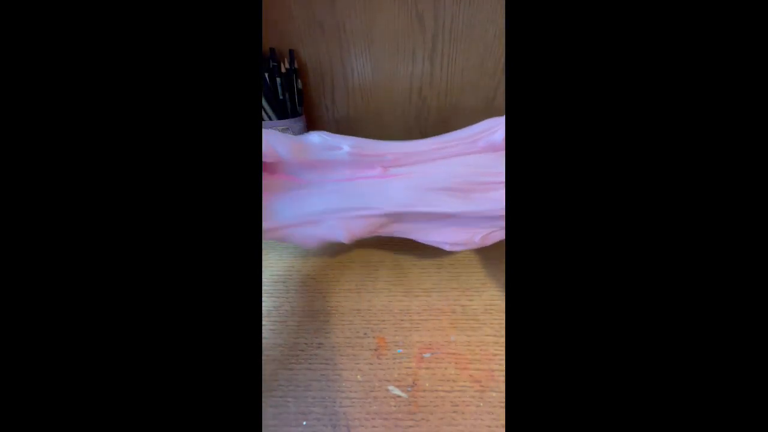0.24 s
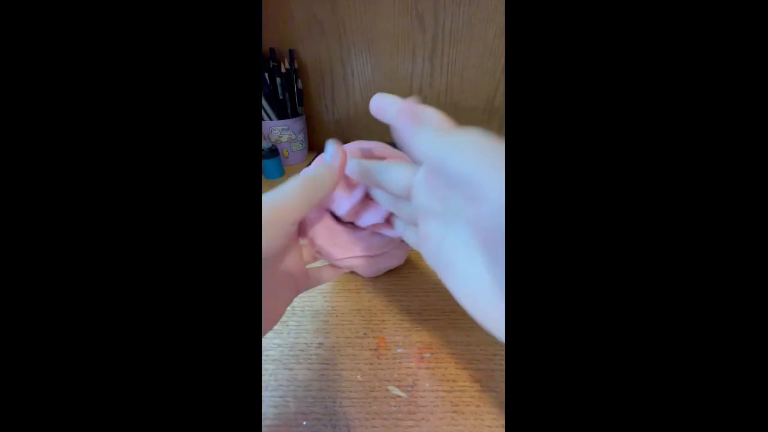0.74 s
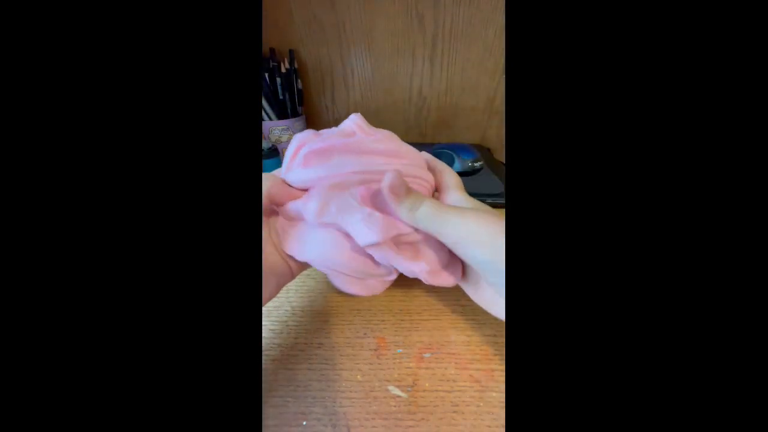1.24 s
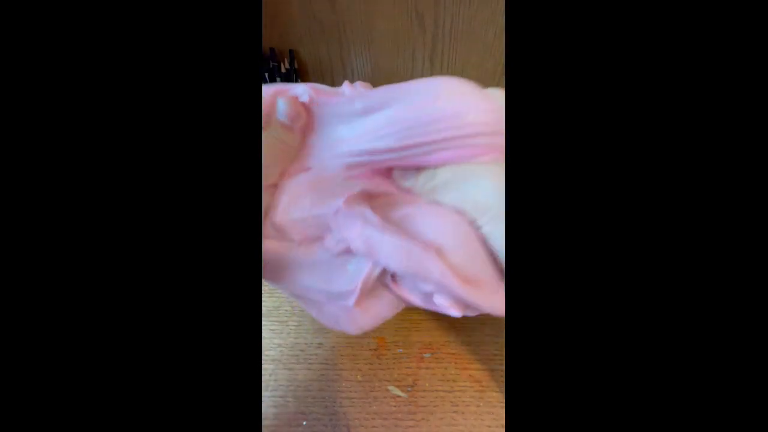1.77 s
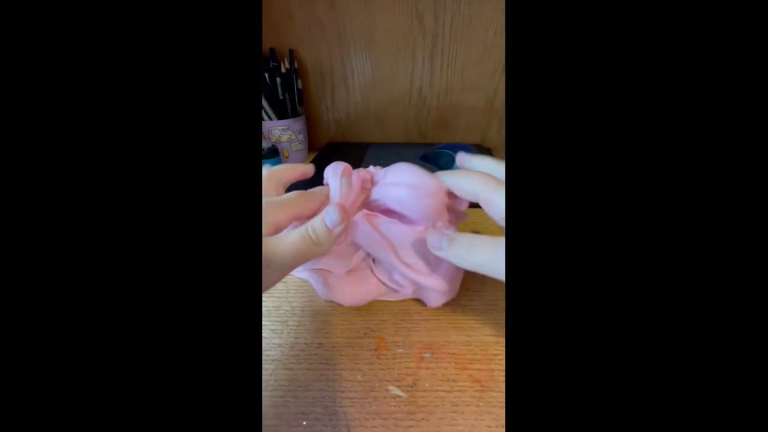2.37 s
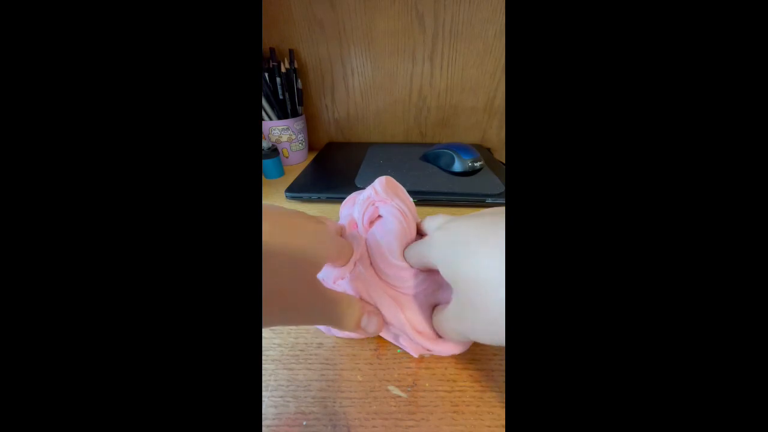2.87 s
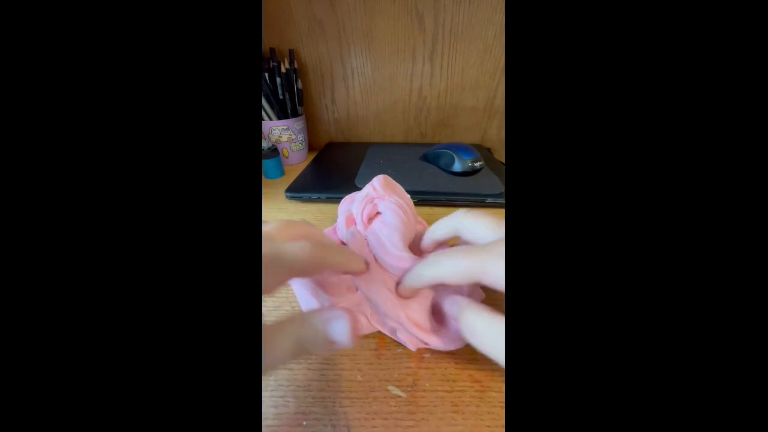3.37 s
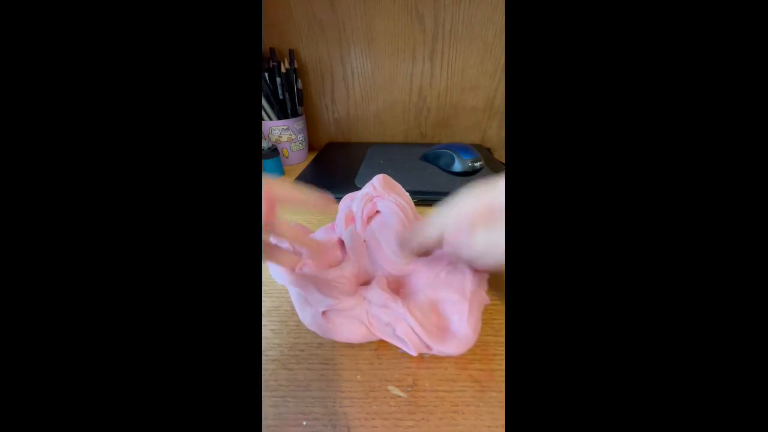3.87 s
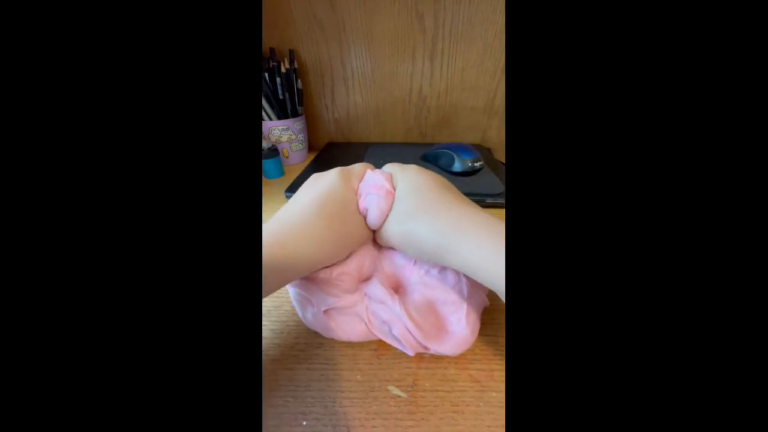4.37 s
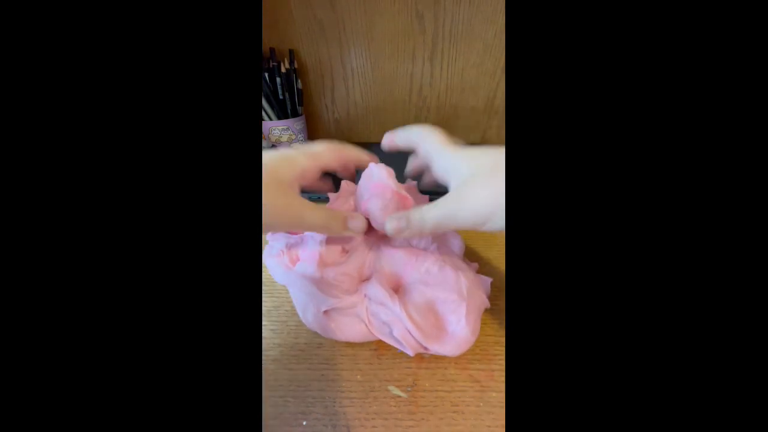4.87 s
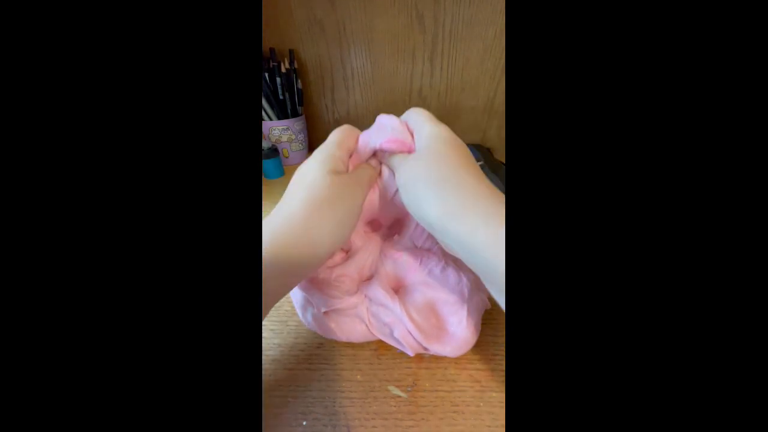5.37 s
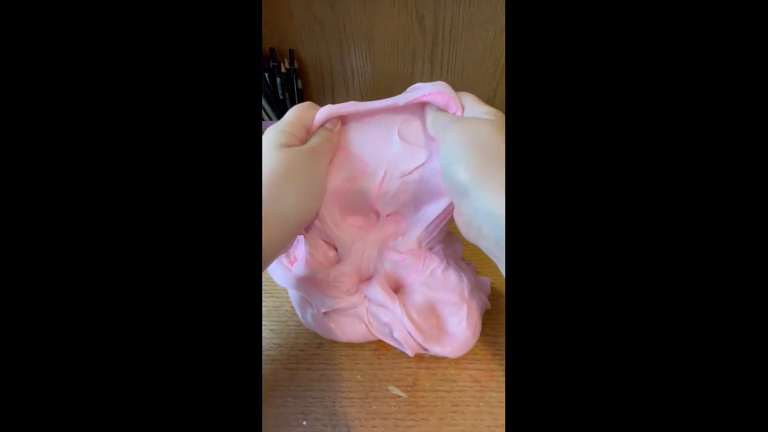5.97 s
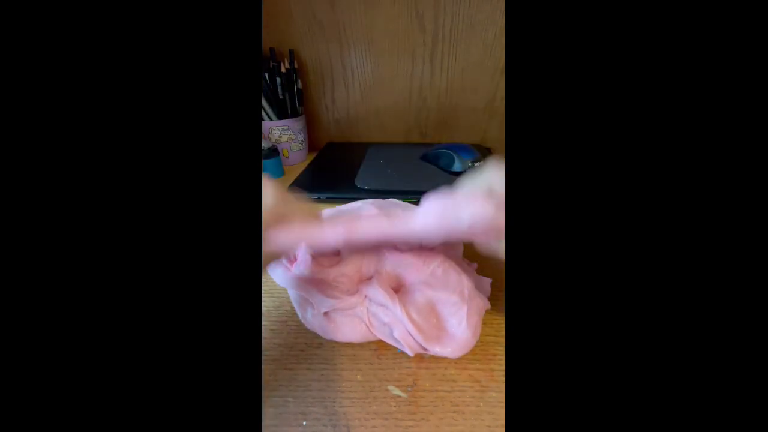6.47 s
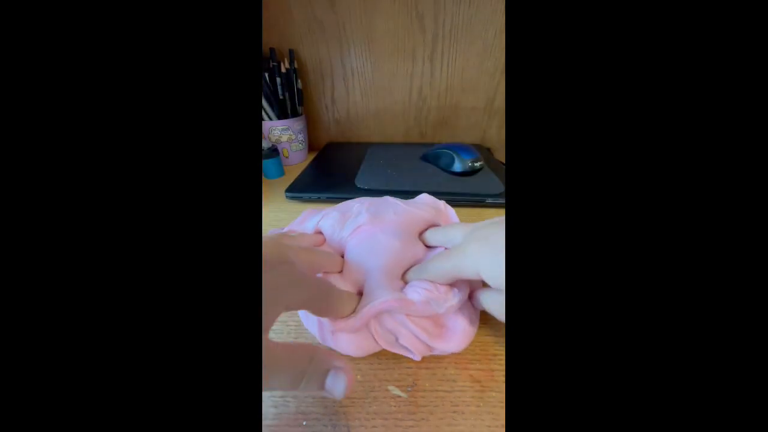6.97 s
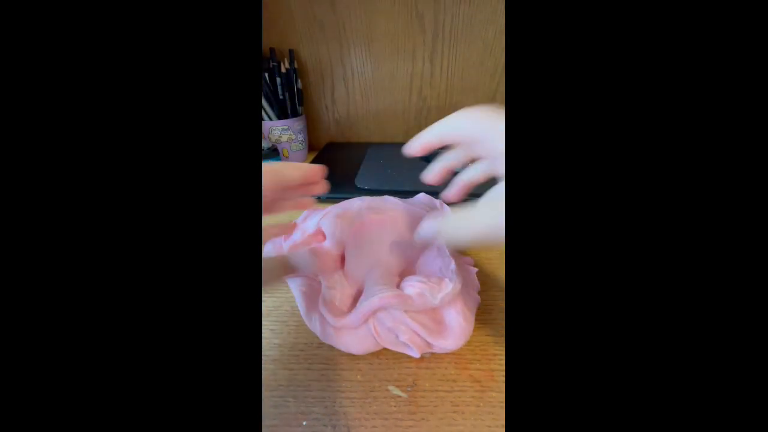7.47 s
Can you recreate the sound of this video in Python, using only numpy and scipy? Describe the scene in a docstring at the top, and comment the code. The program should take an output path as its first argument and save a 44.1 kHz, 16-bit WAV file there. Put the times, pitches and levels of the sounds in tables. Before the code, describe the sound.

Hands knead and stretch thick wet slime up close, with sticky crackles, squelches, sharp snaps, small air pops and soft desk thumps.

```python
"""Wooden desk in a quiet room: hands knead, squeeze and fold thick slime close to a small stereo microphone.
Sticky skin peels in dense crackle and wet ticks; films snap as noise bursts; air pockets pop as sagging tones.
Squeezed air squelches in ringing bubbles and once squeaks through a slit; the lump hisses as it slides.
Pushes and landings excite the desk's modes; snaps, pops and squeak get short echoes; shaped noise is the hush."""
import sys
import numpy as np
from scipy import signal
from scipy.fft import rfft, irfft, next_fast_len
from scipy.io import wavfile
from scipy.ndimage import uniform_filter1d

SR = 44100
rng = np.random.default_rng(int(sys.argv[2]) if len(sys.argv) > 2 else 0)


def log_audio(samples):
    """Write samples as a 16-bit WAV file to the path given in sys.argv[1]."""
    # one column per channel
    frames = np.atleast_2d(samples).T
    # limit to full scale, then quantise
    limited = np.clip(frames, -1, 1)
    pcm = np.round(limited * 32767).astype(np.int16)
    wavfile.write(sys.argv[1], SR, pcm)


def amplitude_ratio(level_db):
    """Convert a level in decibels to the matching linear amplitude (field) ratio."""
    exponent = np.asarray(level_db, float) / 20
    return 10 ** exponent


N = 340893


def evened(x):
    """Scales to rms 1."""
    return x / np.sqrt(np.mean(x ** 2) + 1e-20)


def read(points, hz):
    """Interpolates a spectrum on a log-frequency axis."""
    point_hz, value = np.transpose(points)
    return np.interp(np.log(hz + 1), np.log(point_hz + 1), value)


def resonate(x, hz, width_hz):
    """Single resonance of about unit peak gain."""
    r = np.exp(-np.pi * width_hz / SR)
    pole = r * np.exp(2j * np.pi * hz / SR)
    return 2 * signal.lfilter([1 - r], [1, -pole], x).real


def add(mix, start_s, mid, side):
    """Places a sound in time; the side part is what differs between the ports."""
    part = mix[:, round(start_s * SR):][:, :len(mid)]
    part += np.array([mid + side, mid - side])[:, :part.shape[1]]


def clicks(per_s, spread_db, clump_db, clump_s):
    """Random ticks of either sign and uneven size, their level drifting in clumps."""
    size = amplitude_ratio(spread_db * np.minimum(rng.exponential(1, N), 5))
    size = size * rng.choice([-1., 1.], N)
    clumps = evened(uniform_filter1d(rng.standard_normal(N), max(round(clump_s * SR), 1)))
    return size * (rng.random(N) < per_s / SR) * amplitude_ratio(clump_db * clumps)


# left-right likeness: (frequency [Hz], likeness [0..1])
LIKENESS = [(60, 0.38), (250, 0.11), (600, 0.32), (1400, 0.33), (3100, 0.057), (6800, 0.75), (15000, 0.72)]


def pair(a, b, spectrum):
    """Colours two signals and blends them to the left-right likeness."""
    size = next_fast_len(N)
    hz = np.fft.rfftfreq(size, 1 / SR)
    same = np.clip(read(LIKENESS, hz), 0, 1)
    mid = np.sqrt((1 + same) / 2) * rfft(a, size)
    side = np.sqrt((1 - same) / 2) * rfft(b, size)
    coloured = np.array([mid + side, mid - side]) * amplitude_ratio(read(spectrum, hz))
    return evened(irfft(coloured, size)[:, :N])


# squeezes, pulls, presses: (start [s], hold [s], peeling [dB], squelch [dB], push on the desk [dB])
STROKES = [(0.322, 0.12, -43.5, -57, -54), (0.664, .005, -64, -70.5, -62.5),
           (0.761, 0.018, -50, -67.5, -73), (0.828, 0.0077, -46, -64, -63),
           (1.088, 0.026, -51.5, -69, -77.5), (1.134, 0.0024, -63, -60.5, -55.5),
           (1.194, 0.023, -50, -69, -64.5), (1.271, .005, -67, -69, -52.5), (1.324, 0.007, -63, -60, -37),
           (1.385, 0.006, -46.5, -67.5, -48), (1.462, 0.0037, -53.5, -58, -64),
           (1.572, 0.012, -49, -60.5, -58.5), (1.677, 0.033, -56.5, -51.5, -70),
           (1.939, .005, -54.5, -65.5, -79), (2.219, 0.11, -37, -37, -32.5),
           (2.403, 0.006, -62.5, -60, -47.5), (2.609, 0.0077, -53.5, -56, -57),
           (2.729, 0.0085, -62.5, -65.5, -63.5), (2.865, .005, -49, -59.5, -51),
           (2.96, 0.016, -70.5, -64.5, -50), (3.097, 0.094, -44, -40, -27), (3.301, 0.055, -72, -70, -40),
           (3.516, 0.0026, -55.5, -67, -57.5), (3.846, .055, -38, -36.5, -32),
           (3.93, 0.024, -47.5, -41, -36.5), (4.155, 0.0056, -46, -50, -57.5),
           (4.297, 0.023, -36.5, -59.5, -56), (4.374, 0.0044, -38, -48, -46.5),
           (4.471, 0.029, -37.5, -50, -55), (4.736, 0.011, -49.5, -72, -71.5),
           (4.779, 0.093, -38, -34, -34.5), (4.912, .005, -62.5, -56.5, -41.5),
           (5.094, 0.0055, -64, -61, -50.5), (5.183, 0.0097, -49.5, -59, -46),
           (5.265, 0.002, -46.5, -51.5, -42.5), (5.296, .04, -68.5, -63.5, -38),
           (5.499, 0.0044, -55, -51, -48), (6.381, 0.097, -45, -60.5, -52),
           (6.526, .05, -53.5, -62.5, -70.5), (6.603, 0.0073, -44, -61, -56),
           (6.876, .005, -58.5, -55.5, -57), (7.335, 0.0067, -39.5, -53.5, -33),
           (7.345, 0.051, -41.5, -38, -33.5), (7.623, 0.0056, -56.5, -57.5, -55.5)]
# peeling, squelch, push along a stroke:
# (full from [share of hold], until [share of hold], rise at -48.5 dB [dB/s], fall [dB/s])
FOLLOW = [(0, 1.17, 521.5, 418.5), (.45, 0.94, 376.5, 263), (.45, .6, 424, 236)]
# fingers resting and sliding between strokes: (time [s], contact [dB], wetness [dB])
TOUCH = [(0, -63, -41), (.15, -75, -35), (0.312, -47.5, -17.5), (0.601, -60, -14), (0.959, -67, -37),
         (1.518, -65.5, -0.5), (1.8, -54, -6), (2.15, -72.5, -14.5), (2.551, -62, -11.5), (3.051, -66.5, 1),
         (3.36, -73.5, -4), (3.452, -62, -5.5), (3.721, -75, -7), (4.091, -71, -9), (4.259, -51.5, -13.5),
         (4.549, -52.5, 2.5), (4.679, -62, -22), (5.019, -80.5, -0.5), (5.15, -64.5, -3.5),
         (5.451, -54.5, -5.5), (5.62, -67.5, -6), (5.98, -73.5, -32), (6.25, -85, -3.5), (6.7, -69.5, -5),
         (7.07, -65, -6), (7.17, -72.5, -8), (7.28, -81.5, -19.5), (7.471, -69.5, -7.5),
         (7.73, -60.5, -3.5)]
# per layer: (weight of wetness in the resting level [dB/dB])
WET_SHARE = [0, 1, 0.93]
# per layer: (offset of the resting level [dB])
REST_DB = [1.5, -3, -13.5]


def effort(layer):
    """Gain of layer 0 peeling, 1 squelch, 2 push: strokes over resting contact; powers add."""
    hurry = 0.22  # stronger strokes rise faster: dB of speed per dB of strength
    t = np.arange(0, N / SR + .004, .002)
    strokes = np.array(STROKES)[:, :, None]
    start_s, hold_s, db = strokes[:, 0], strokes[:, 1], strokes[:, 2 + layer]
    begin, end, rise, fall = FOLLOW[layer]
    rise = rise * amplitude_ratio(hurry * (db + 48.5))
    before_db = rise * (start_s + begin * hold_s - t)
    after_db = fall * (t - start_s - end * hold_s)
    below_db = np.maximum(np.maximum(before_db, after_db), 0)
    touch_s, contact_db, wet_db = np.transpose(TOUCH)
    rest_db = np.interp(t, touch_s, contact_db + WET_SHARE[layer] * wet_db + REST_DB[layer])
    power = amplitude_ratio(rest_db) ** 2 + (amplitude_ratio(db - below_db) ** 2).sum(0)
    return np.interp(np.arange(N) / SR, t, np.sqrt(power))


# colour of the hush: (frequency [Hz], relative density [dB per Hz])
HUSH = [(15, -32), (25, -0.5), (80, 4), (242, -9), (373, -10.5), (887, -42.5), (12200, -20.5),
        (16000, -24.5)]


def hush():
    """Steady shaped noise of the quiet room."""
    hush_rms_db = -73
    return amplitude_ratio(hush_rms_db) * pair(*rng.standard_normal((2, N)), HUSH)


# decay of the echoes: (frequency [Hz], t60 [s])
ROOM = [(200, 0.012), (2000, 0.08), (12000, 0.06)]


def room(x):
    """Sparse echoes of random sign from desk and walls, each band dying at its own speed."""
    echo_db = -13
    taps = np.zeros((2, SR // 2))
    at = np.arange(100, SR // 2 - 20, 20)
    at = at + rng.integers(0, 20, (2, len(at)))
    np.put_along_axis(taps, at, rng.choice([-1., 1.], at.shape), 1)
    hz, t, z = signal.stft(taps, SR, nperseg=256)
    decay = amplitude_ratio(-60 * t / read(ROOM, hz)[:, None])
    tail = signal.istft(z * decay, SR, nperseg=256)[1]
    tail = tail / np.linalg.norm(tail[0])
    return amplitude_ratio(echo_db) * signal.oaconvolve(x, tail, axes=1)[:, :N]


# desk-top modes: (frequency [Hz], width [Hz], level before division by root width [dB])
DESK = [(51, 6.1, -6), (62.6, 6.8, -11), (90, 19, -0.5), (119.4, 24, 5), (158.6, 42, -2), (206, 25, -11.5)]


def thrum(push):
    """Desk-top modes driven by the soft 45-300 Hz part of a push."""
    band = signal.butter(2, [45, 300], "band", fs=SR, output="sos")
    soft = signal.sosfilt(band, push)
    out = 0
    for hz, width_hz, db in DESK:
        mode = resonate(resonate(soft, hz, width_hz), hz, 3 * width_hz)
        out = out + amplitude_ratio(db) * mode / np.sqrt(width_hz)
    return out


# the lump or a palm lands on the desk: (time [s], peak [dB])
THUDS = [(0.397, -43), (0.634, -51.5), (1.119, -42.5), (1.246, -38.5), (1.325, -31), (1.826, -47),
         (3.099, -23), (3.855, -40), (4.127, -37), (6.385, -40), (7.329, -25)]


def desk():
    """Uneven pushes and a few landings set the desk thrumming, alike at both ports."""
    push = effort(layer=2)
    out = thrum(clicks(per_s=250, spread_db=2.0, clump_db=1.5, clump_s=.03) * push)
    out = out * np.sqrt(np.mean(push ** 2) / np.mean(out ** 2))
    out = np.tile(out, (2, 1))
    blow = np.hanning(round(0.0055 * SR))
    thud = thrum(np.pad(blow, (0, SR // 4)))
    for start_s, peak_db in THUDS:
        add(out, start_s, amplitude_ratio(peak_db) * thud / abs(thud).max(), 0 * thud)
    return out


# the lump slides under the palms: (start [s], length [s], level [dB], pitch [share])
SLIDES = [(2.897, 0.51, -68.5, 0.92), (3.967, 0.13, -58, 0.94), (6.816, 0.35, -63, .9),
          (7.408, 0.34, -63, 0.97)]
# hollows, before the pitch share: (frequency [Hz], width [Hz], level [dB])
HOLLOWS = [(400, 220, 0), (700, 300, -1), (2480, 300, -5), (2800, 350, -9)]


def slides():
    """Uneven hiss in hollows that sag and narrow: resonant noise read at a falling speed."""
    out, t = np.zeros((2, N)), np.arange(SR // 2) / SR
    noises = rng.standard_normal((len(SLIDES), 3, SR))
    for (start_s, long_s, level_db, pitch), noise in zip(SLIDES, noises):
        hiss = 0
        for hz, width_hz, db in HOLLOWS:
            ring = resonate(resonate(noise[:2], hz, width_hz), hz, 2 * width_hz)
            hiss = hiss + amplitude_ratio(db) * evened(ring)
        at = np.cumsum(pitch * (1 + .1 * np.exp(-t / .1)))
        mid, side = (np.interp(at, np.arange(SR), v) for v in evened(hiss))
        uneven = amplitude_ratio(2 * evened(uniform_filter1d(noise[2], 900))[:len(t)])
        fade = np.clip(np.minimum(t / 0.015, (long_s - t) / 0.1), 0, 1)
        shape = amplitude_ratio(level_db) * uneven * fade
        add(out, start_s, shape * mid, .5 * shape * side)
    return out


# slit flutter: (time [s], frequency [Hz], level of the fundamental [dB])
SQUEAK = [(7.3465, 5600, -38), (7.3492, 5750, -14), (7.3507, 6200, -12), (7.3517, 6700, -5),
          (7.3529, 6900, -26), (7.354, 6500, -13), (7.357, 6100, -30)]


def squeak():
    """Squeezed air flutters a slit: the tone rises, then dips; its octave grows as the slit closes."""
    point_s, hz, db = np.transpose(SQUEAK)
    t, out = np.arange(point_s[0], point_s[-1], 1 / SR), np.zeros((2, N))
    angle = 2 * np.pi * np.cumsum(np.interp(t, point_s, hz)) / SR
    octave = 0.87 * np.clip((t - point_s[0]) / 0.0068, 0, 1)
    tone = np.exp(1j * angle) + octave * np.exp(2j * angle)
    tone = amplitude_ratio(np.interp(t, point_s, db)) * tone
    add(out, point_s[0], tone.imag, 0.5 * tone.real)
    return out


# air pockets that burst: (start [s], mid peak [dB], settled frequency [Hz], t60 [s])
POPS = [(0.552, -52.5, 872, 0.018), (0.764, -41, 712, 0.095), (0.832, -42, 693, 0.064),
        (1.331, -28, 278, 0.024), (1.382, -42.5, 418, 0.059), (1.553, -41.5, 740, 0.028),
        (1.624, -43.5, 403, 0.039), (1.693, -37.5, 1610, 0.025), (2.226, -35, 450, 0.11),
        (2.653, -48.5, 520, 0.031), (2.748, -50, 360, 0.022), (2.855, -48.5, 356, 0.086),
        (3.126, -14.5, 406, 0.021), (3.299, -35, 390, 0.048), (3.458, -42.5, 430, 0.012),
        (3.521, -48, 430, 0.036), (3.599, -56.5, 800, 0.037), (3.808, -37.5, 866, 0.026),
        (4.292, -41.5, 402, 0.028), (4.357, -22, 377, 0.02), (4.466, -27.5, 474, 0.042),
        (4.509, -32.5, 1630, 0.015), (4.776, -34, 478, 0.049), (4.874, -22.5, 1410, 0.01),
        (4.845, -26.5, 1446, 0.036), (5.092, -51, 800, 0.033), (5.27, -35.5, 487, 0.033),
        (5.308, -42, 400, 0.034), (5.385, -40, 282, 0.097), (5.477, -42.5, 500, .025),
        (5.496, -42.5, 430, 0.041), (6.819, -48.5, 600, 0.01), (7.329, -21.5, 434, 0.027)]


def pops():
    """A cavity rings briefly, its pitch sagging as it opens, roughened by wet edges."""
    out, t = np.zeros((2, N)), np.arange(4000) / SR
    noises = rng.standard_normal((len(POPS), 2, 4000))
    for (start_s, peak_db, hz, t60_s), noise in zip(POPS, noises):
        shape = (1 - np.exp(-t / .004)) * amplitude_ratio(-60 * t / max(t60_s, .005))
        sagging_hz = hz * (1 + 0.26 * np.exp(-t / 0.0013))
        angle = 2 * np.pi * np.cumsum(sagging_hz) / SR
        wet = 0.48 * evened(resonate(resonate(noise, hz, hz / 2), hz, hz))
        # sine mid, cosine side: a phase lead between the ports
        pop = shape * (np.array([np.sin(angle), np.cos(angle)]) + wet)
        pop *= amplitude_ratio(peak_db) / abs(pop[0]).max()
        add(out, start_s, pop[0], min(hz / 1200, .6) * pop[1])
    return out


# films that tear: (time of envelope peak [s], mid peak [dB], strongest frequency [Hz], length scale [ms])
SNAPS = [(0.335, -35.5, 2970, 9), (0.928, -45, 10900, 2.8), (1.0062, -40, 13890, 1.4),
         (1.048, -41.5, 2100, 2.3), (1.3855, -34, 6900, 1.1), (1.4704, -36, 13750, 0.73),
         (1.556, -36, 1300, 2), (1.565, -45, 13750, 1.7), (1.5754, -27.5, 10580, 4),
         (1.6123, -33.5, 10950, 2.6), (1.66, -39, 6860, 2.2), (1.697, -30.5, 3170, 10),
         (1.7498, -32.5, 3200, 4.1), (1.8465, -32.5, 8560, 1.8), (1.882, -31, 8700, 2.2),
         (1.934, -34, 6680, 3), (1.988, -42.5, 900, 3.6), (2.0225, -46, 13800, 7.1),
         (2.041, -44.5, 950, 4.1), (2.0753, -46.5, 2120, 0.92), (2.5805, -33, 7000, 0.93),
         (2.61, -35.5, 2470, 2.0), (2.653, -41.5, 1200, 2.9), (2.7455, -34.5, 2560, 4),
         (2.8711, -41, 4400, 3.1), (3.063, -47, 3380, 2), (3.1248, -15, 2637, 0.69),
         (3.4565, -42, 1150, 1.4), (3.5166, -31, 7140, 0.46), (3.6016, -38.5, 14100, 1.8),
         (3.797, -46, 1700, 20), (3.8082, -28, 4230, 2), (3.8524, -28, 4420, 3.8),
         (3.8617, -19.5, 11000, 4.2), (3.89, -25.5, 5000, 7.6), (4.147, -18.5, 8980, 3),
         (4.1937, -32.5, 2685, 2.6), (4.244, -36, 13770, 1.4), (4.2624, -23, 6800, 1.6),
         (4.3094, -24, 3184, 2.2), (4.3346, -18, 5760, 1.2), (4.357, -17, 1287, 1.4),
         (4.387, -23.5, 8700, 2.7), (4.3929, -24.5, 7380, 1.1), (4.448, -34.5, 2200, 2.5),
         (4.4695, -4, 8150, 4.7), (4.5608, -26.5, 14050, 0.87), (4.771, -27, 2132, 4.3),
         (4.778, -17.5, 1670, 0.94), (5.126, -42.5, 2020, 2.4), (5.178, -55, 2880, 2.2),
         (5.1945, -20.5, 14700, 0.57), (5.205, -44, 2600, 5.6), (5.2707, -29, 2600, 1.2),
         (5.345, -38, 4000, 1.5), (5.3833, -37, 4330, 1.9), (5.401, -52, 1100, 1.4), (5.54, -46, 4300, 2.4),
         (5.81, -50.5, 6850, 1.9), (6.1187, -52.5, 6900, 1.9), (6.8628, -33.5, 3340, 0.24),
         (6.88, -42, 1700, 3.9), (7.215, -54, 3490, 3.8), (7.329, -17.5, 13670, 4.1),
         (7.609, -37, 13800, 1.6), (7.7024, -34.5, 1490, 2.1)]


def snaps():
    """Noise burst that swells to its peak and dies more slowly, broad with one strong region."""
    out, ms = np.zeros((2, N)), np.arange(-SR // 100, SR // 25) / SR * 1000
    noises = rng.standard_normal((len(SNAPS), 2, len(ms)))
    for (peak_s, peak_db, hz, long_ms), noise in zip(SNAPS, noises):
        shape = np.exp(np.where(ms < 0, ms / (.35 * long_ms), -ms / (.75 * long_ms)))
        high_pass = signal.butter(2, 350 + 0.035 * hz, "high", fs=SR, output="sos")
        tear = signal.sosfilt(high_pass, noise * shape)
        strong = resonate(resonate(tear, hz, .6 * hz), hz, hz)
        tear = evened(tear) + 1.2 * evened(strong)
        tear *= amplitude_ratio(peak_db) / abs(tear[0]).max()
        add(out, peak_s + ms[0] / 1000, tear[0], .45 * tear[1])
    return out


def squelch():
    """Small air pockets of all sizes ring for a few cycles; sizes alternate between the ports."""
    out = np.zeros((2, N))
    for k, hz in enumerate(np.geomspace(270, 2000, 14)):
        train = clicks(per_s=130, spread_db=2.2, clump_db=2.2, clump_s=.02)
        bubble = evened(resonate(resonate(train, hz, hz * 0.47), hz, hz / 2))
        bubble = bubble * amplitude_ratio(-4.0 * np.log2(hz / 300))
        late = np.roll(bubble, round(.00012 * SR))  # the farther port hears it later
        out += np.array([bubble, late])[::(-1) ** k]
    return effort(layer=1) * evened(out)


def ticks():
    """Wet threads snap at random while the skin peels, each a few cycles in a broad band."""
    per_s_per_size, ticks_over_peeling_db, effort_cap_db = 25, -11, -46.5
    out = np.zeros((2, N))
    for k, hz in enumerate(np.geomspace(600, 4500, 6)):
        train = clicks(per_s=per_s_per_size, spread_db=3, clump_db=2, clump_s=.03)
        tick = evened(resonate(resonate(train, hz, hz * 0.79), hz, hz))
        far = .7 * np.roll(tick, 3)
        out += np.array([tick, far])[::(-1) ** k]
    touch_s, _, wet_db = np.transpose(TOUCH)
    wet = amplitude_ratio(np.minimum(np.interp(np.arange(N) / SR, touch_s, wet_db), 0))  # fainter on dry skin
    capped = np.minimum(effort(layer=0), amplitude_ratio(effort_cap_db))
    return amplitude_ratio(ticks_over_peeling_db) * capped * wet * evened(out)


# colour of the crackle before wetting: (frequency [Hz], relative density [dB per Hz])
CRACKLE = [(410, -32), (700, -0.5), (1400, -5.5), (2100, -3.5), (3300, -4), (4900, -9), (8300, -4),
           (10800, -9.5), (13000, -5.5), (15500, -8.5)]


def peeling():
    """Thousands of tiny threads let go of the skin; sparser, thicker ones ring."""
    a, b = (clicks(per_s=14000, spread_db=1.5, clump_db=2.2, clump_s=0.009) for _ in "ab")
    thick = 0
    for ring_hz in np.geomspace(2200, 12000, 5):
        train = clicks(per_s=21, spread_db=-1.5, clump_db=-3.5, clump_s=0.92)
        thick = thick + resonate(train, ring_hz, 0.51 * ring_hz)
    crackle = pair(evened(a) + 0.1 * evened(thick), evened(b), CRACKLE)
    hz, t, z = signal.stft(crackle, SR, nperseg=256)
    patches = rng.standard_normal(z.shape[::-1][:2]).T
    patches = evened(uniform_filter1d(uniform_filter1d(patches, 5, 0), 6, 1))
    peel = effort(layer=0)
    # wet folds darken the crackle, dry skin thins it
    wet_db = np.interp(t, np.arange(N) / SR, 20 * np.log10(effort(layer=1) / peel))
    z *= amplitude_ratio(2 * patches + 0.46 * wet_db / (1 + (hz[:, None] / 2500) ** 2))
    return peel * evened(signal.istft(z, SR, nperseg=256)[1][:, :N])


def scene():
    """Slime, the echoes of its sharp sounds, desk and hush."""
    sharp = snaps() + pops() + squeak()
    background = hush()
    slime = sharp + room(sharp) + peeling() + ticks() + squelch()
    return slime + desk() + slides() + background


def top_cut(x):
    """Nothing passes above the cut-off."""
    return signal.sosfilt(signal.butter(12, 16610, fs=SR, output="sos"), x)


def record(dry):
    """The recorder's treble limit: a steep low-pass."""
    edge_hz, ripple_db = 15800, 1
    low_pass = signal.cheby1(10, ripple_db, edge_hz, fs=SR, output="sos")
    limited = signal.sosfilt(low_pass, dry)
    return top_cut(limited)


dry = scene()
out = record(dry)
log_audio(out)
```